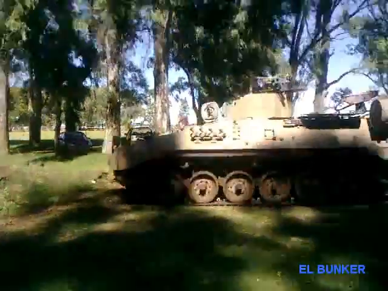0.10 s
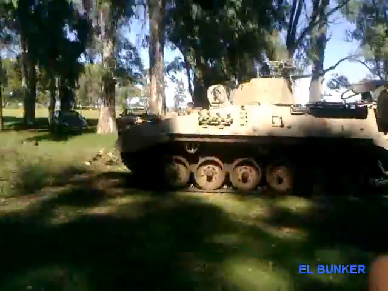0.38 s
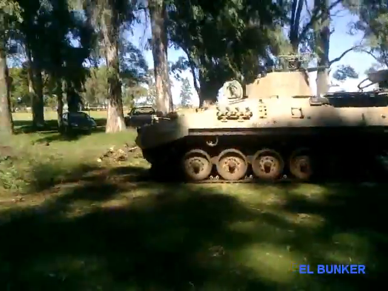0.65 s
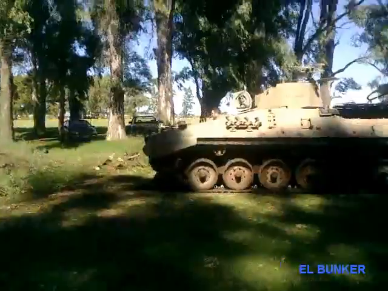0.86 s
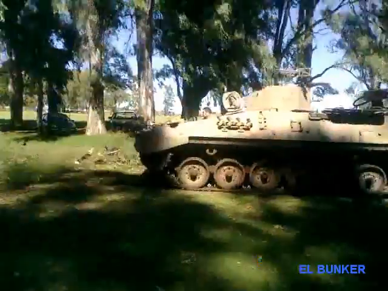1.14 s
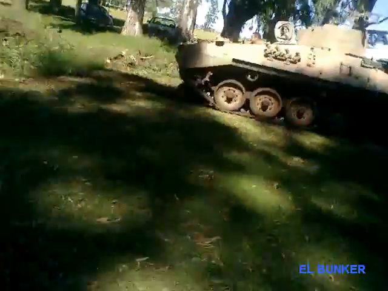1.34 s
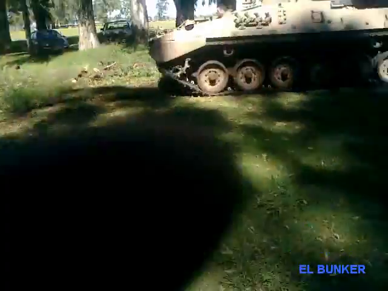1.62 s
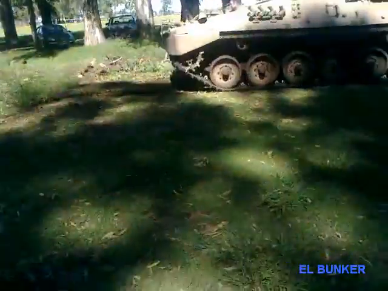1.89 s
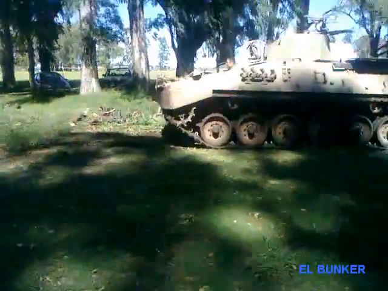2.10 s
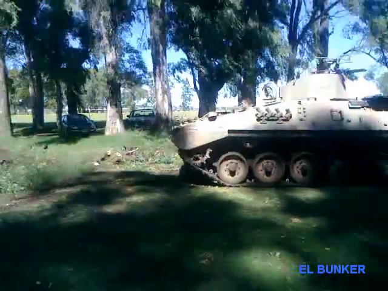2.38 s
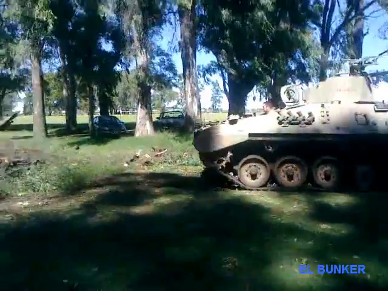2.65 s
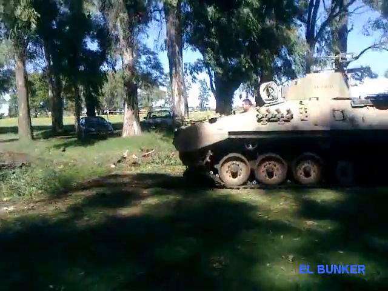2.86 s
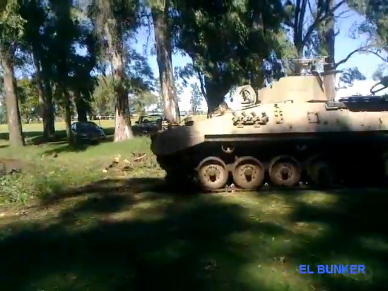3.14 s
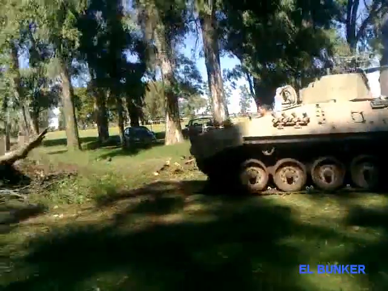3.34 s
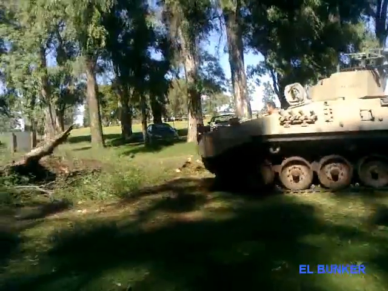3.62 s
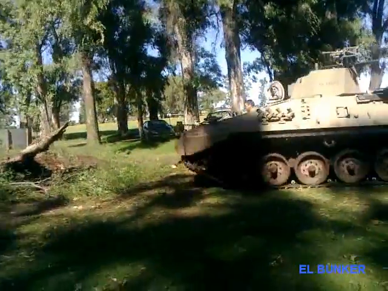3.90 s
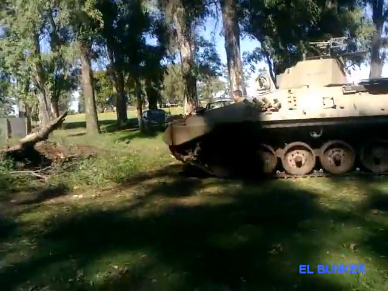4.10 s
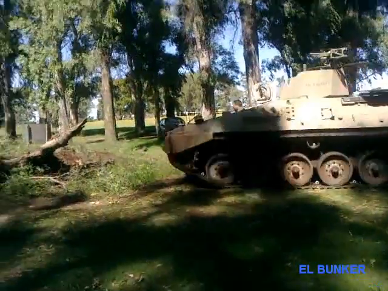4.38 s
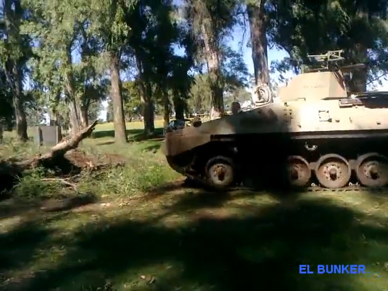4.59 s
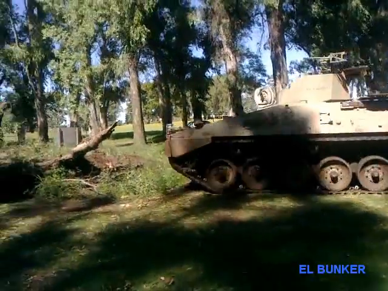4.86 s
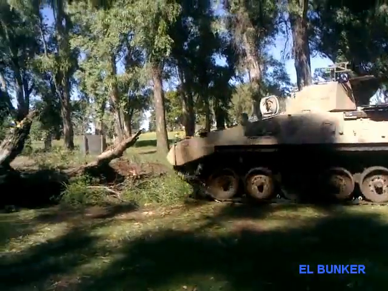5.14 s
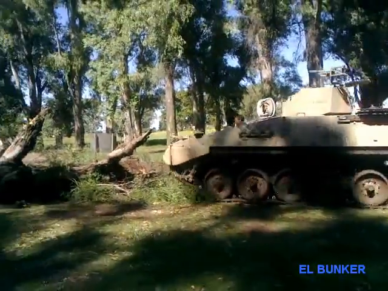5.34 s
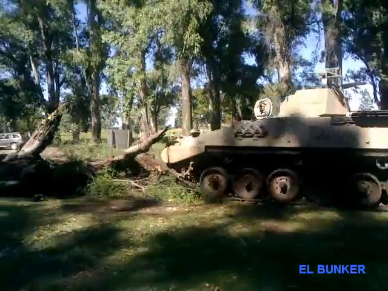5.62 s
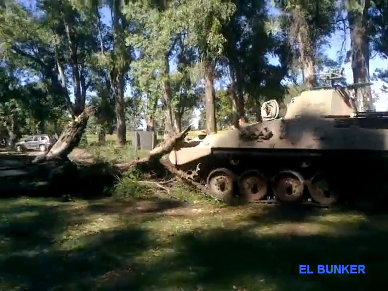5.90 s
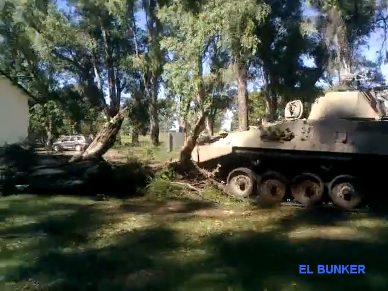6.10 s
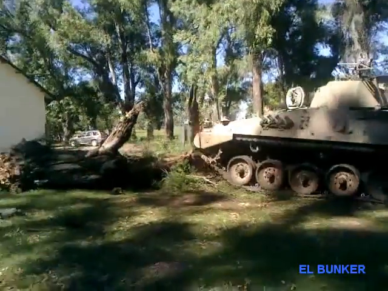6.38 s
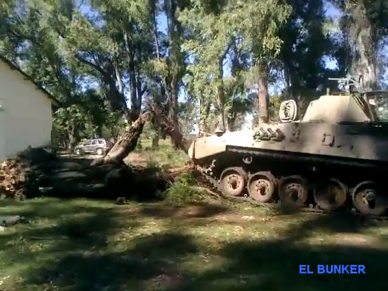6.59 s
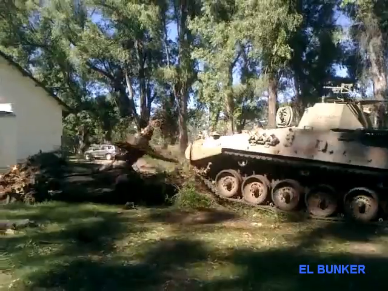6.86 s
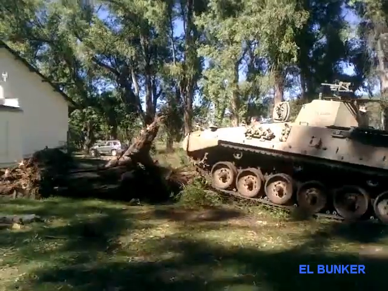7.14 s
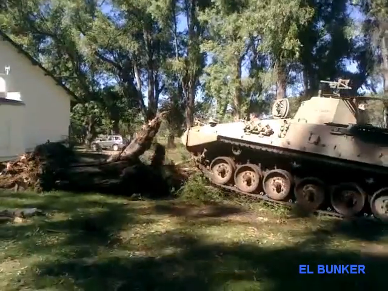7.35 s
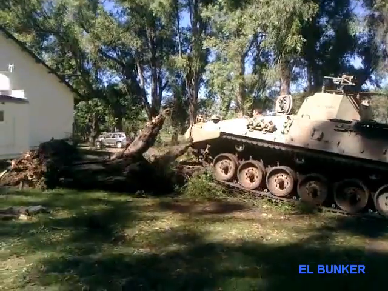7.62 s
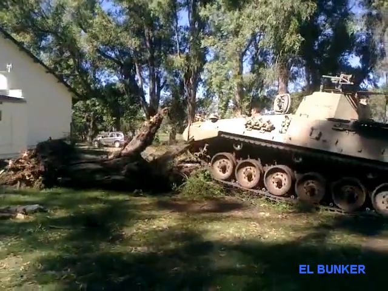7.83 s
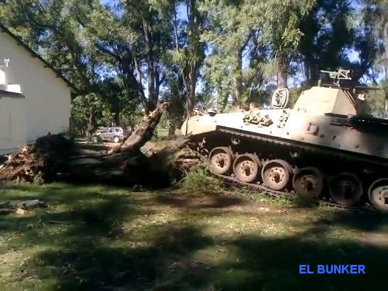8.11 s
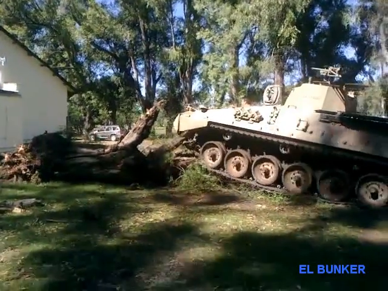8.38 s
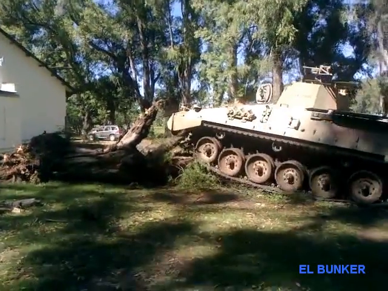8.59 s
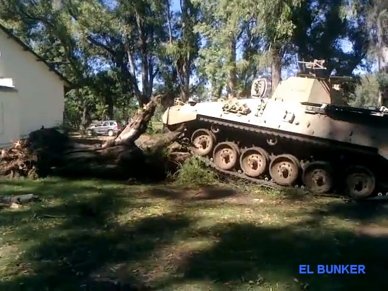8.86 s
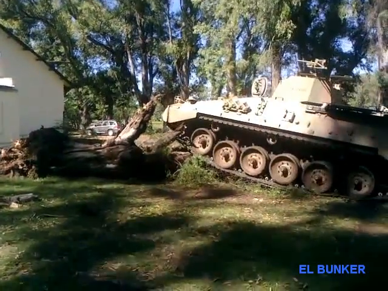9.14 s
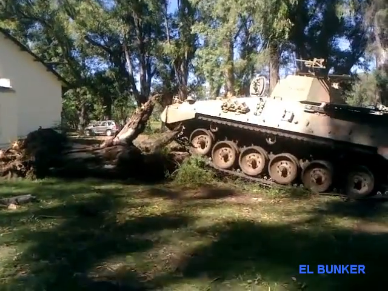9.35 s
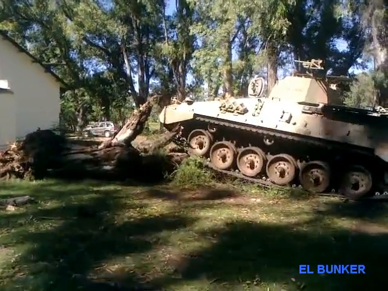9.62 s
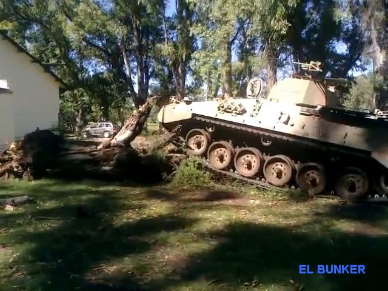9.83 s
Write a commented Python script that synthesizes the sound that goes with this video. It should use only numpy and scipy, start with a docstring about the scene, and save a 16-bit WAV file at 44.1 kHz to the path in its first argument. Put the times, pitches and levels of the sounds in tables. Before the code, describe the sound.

Outdoors, a deep, lumpy diesel growls up and down while steel track links rattle, branches snap and splinter, and leaves rustle.

```python
"""Among trees, a heavy tracked vehicle revs its diesel in five surges and pushes onto a felled trunk. Uneven
firings are pulses shaped into exhaust booms; noise makes valve clatter and hiss, and a tone the fan. Short
noise bursts make track links clank and wood crack; random ticks and noise make twigs and leaves rustle. A phone
some metres off hears it from behind trunks and a wall."""
import sys
import numpy as np
from scipy import signal
from scipy.fft import rfft, irfft
from scipy.io import wavfile
from scipy.ndimage import uniform_filter1d

SR = 44100
rng = np.random.default_rng(int(sys.argv[2]) if len(sys.argv) > 2 else 0)


def digitize_waveform(pressure):
    """Quantize a signal to 16-bit integers and store it at the path in sys.argv[1].

    Rows of a 2-D input are taken as channels; values are limited to [-1, 1].
    """
    field = np.atleast_2d(pressure).T
    bounded = np.clip(field, -1, 1)
    quanta = np.round(bounded * 32767).astype(np.int16)
    wavfile.write(sys.argv[1], SR, quanta)


def voltage_ratio(decibels):
    """Convert decibels (scalar or array-like) to amplitude ratios, 20 dB per decade."""
    exponent = np.asarray(decibels, float) / 20
    return 10 ** exponent


N = 440118
T = np.arange(N) / SR

# the drive crunches into gear: start_s [s], peak_db [dB], length_ms [ms]
GEAR_CRUNCH = (1.746, -27.5, 68)
# ringing of the engine block: pitch_hz [Hz], level_db [dB], time to fall 60 dB ring_s [s]
BLOCK_RING = [(700, 4, 0.024), (1125, 2, 0.045), (1280, -9, 0.07), (2400, -6, 0.05)]
# tone of breaking wood, also used in the gear crunch: pitch_hz [Hz], level_db [dB per Hz]
WOOD_TONE = [(300, 9), (700, 4.5), (1200, 2), (1900, 2), (2700, 3), (3600, -2), (5000, -10.5),
             (7000, -26.5)]
IDLE_HZ = 20.91  # crank turns per second at idle
BRUSHWOOD_S = 5.0  # from here on the links run through brushwood and ring less


def colour(x, points):
    """Tone filter that follows (Hz, dB) points and never sounds before its input."""
    hz, db = np.transpose(points)
    size = 16384
    bins_hz = np.arange(1, size // 2 + 2) * SR / size
    log_gain = np.interp(np.log(bins_hz), np.log(hz), db) * np.log(10) / 20
    # folding the cepstrum (the spectrum of the log gain) makes the filter causal
    cepstrum = irfft(log_gain)
    cepstrum[1:size // 2] *= 2
    cepstrum[size // 2 + 1:] = 0
    response = irfft(np.exp(rfft(cepstrum)))[:size // 2]
    return signal.fftconvolve(x, response)[:len(x)]


def unit(x):
    """Scale to an average strength (rms) of 1."""
    return x / np.sqrt(np.mean(x ** 2))


def walk(rate):
    """A smooth random wander with `rate` new levels a second and an rms of 1."""
    hold = int(SR / rate)
    steps = np.repeat(rng.standard_normal(N // hold + 1), hold)
    smooth = uniform_filter1d(uniform_filter1d(steps, hold), hold)
    return unit(smooth[:N])


def ring(x, hz, t60):
    """One ringing tone set off by x, falling 60 dB in t60 seconds."""
    pole = np.exp(2j * np.pi * hz / SR - np.log(1000) / (t60 * SR))
    return signal.lfilter([1], [1, -pole], x).imag


def modes(x, table):
    """Several ringing tones struck together, scaled to rms 1."""
    return unit(sum(voltage_ratio(db) * ring(x, hz, t60) for hz, db, t60 in table))


def add(out, start_s, sound):
    """Mix a short sound in at its start time."""
    i = int(start_s * SR)
    out[i:i + len(sound)] += sound[:N - i]


def burst(length_ms, scatter_db):
    """A run of tiny slips of uneven size that swells, then dies away."""
    t_ms = np.arange(SR // 8) / SR * 1000
    # a new random size about every millisecond
    sizes = np.repeat(rng.exponential(size=len(t_ms) // 44 + 1), 44)[:len(t_ms)]
    slips = rng.standard_normal(len(t_ms)) * voltage_ratio(scatter_db * sizes)
    swell = np.minimum(t_ms / (0.22 * length_ms), 1)
    return slips * np.exp(-(t_ms / length_ms) ** 1.2) * swell


def pedal():
    """Crank rate and exhaust level: the pedal pulls the flywheel up, drag slows it, the governor catches it."""
    # pedal presses, the first two run together: press_s [s], release_s [s], aim_hz (rate it pulls towards) [Hz],
    # coasting_loss [Hz per s], settle_hz [Hz], ease_off_s [s]
    presses = [(1.447, 2.551, 26.35, 28, 25.5, 0.13), (2.589, 3.3, 42.75, 60, 21.8, .42),
               (4.09, 4.88, 43.81, 12.8, 26.1, 0.13), (5.616, 6.377, 52.87, 33.6, 22.1, .12),
               (7.463, 8.359, 46.05, 41.1, 19.6, .14), (9.139, 10.502, 45.14, 36.6, 19.8, .1)]
    # changes of exhaust level: start_s [s], pedal_down_db [dB], pedal_up_db [dB]
    effort = [(1.5, 1, -0.5), (3, 0.35, -2), (5, -.5, 1.5), (6.5, -2.5, -1.5), (8, 1, -1.5),
              (10, 2.5, -1.5)]
    pull_s, torque_s, landing_hz = .655, .139, 3.67  # how fast it climbs, grips and settles
    mid_hz = 31.2  # the crank rate at which the two base levels below apply
    open_db, open_db_per_hz, shut_db, shut_db_per_hz = -25.5, 0.6, -29, 0.4952
    kick_db_per_hz = 0.1547  # louder while far below the rate it pulls towards
    governor_db, governor_hz = 4.5, 2.4  # fuel comes back near the settling rate
    # the exhaust answers the pedal late, and sharply when pressed
    fuel_on_s, fuel_off_s, fuel_edge_s = 0.078, 0.018, 0.023

    step_s = .01
    t = np.arange(0, N / SR + step_s, step_s)
    press, release, aim_hz, loss, rest_hz, ease = np.transpose(presses)

    def held(on_delay, off_delay, edge):
        """How far each press is felt, from 0 to 1, after the given delays in seconds."""
        pressed = np.clip((t[:, None] - on_delay - press) / edge, 0, 1)
        let_go = np.clip((t[:, None] - off_delay - release) / ease, 0, 1)
        return pressed - let_go

    torque = held(0, 0, torque_s)
    fuel = held(fuel_on_s, fuel_off_s, fuel_edge_s).sum(axis=1)
    pull, grip = torque @ aim_hz, torque.sum(axis=1)
    last = np.searchsorted(release, t)  # how many presses are over
    loss = np.r_[loss[0], loss][last]
    rest_hz = np.r_[IDLE_HZ, rest_hz][last]
    hz, now = np.empty(len(t)), IDLE_HZ
    for i in range(len(t)):
        hz[i] = now
        climb = (pull[i] - grip[i] * now) / pull_s
        drag = (1 - grip[i]) * loss[i] * np.tanh((now - rest_hz[i]) / landing_hz)
        now += step_s * (climb - drag)

    start_s, down_db, up_db = np.transpose(effort)
    kick = kick_db_per_hz * (pull - grip * hz)
    opened = kick + open_db + open_db_per_hz * (hz - mid_hz) + np.interp(t, start_s, down_db)
    governor = governor_db * np.exp(-((hz - rest_hz) / governor_hz) ** 2)
    shut = np.interp(t, start_s, up_db) + shut_db + shut_db_per_hz * (hz - mid_hz) + governor
    return np.interp(T, t, hz), np.interp(T, t, fuel * opened + (1 - fuel) * shut)


def firings(hz, turns, load, ragged):
    """Firings are single pulses at uneven points of each crank turn; each also starts a fading puff."""
    # firings heard in one turn: turn_share [0 to 1], idle_db [dB], load_db [dB]
    firing_points = [(0, -3, 11.5), (0.373, 0.5, -11.5), (0.697, -39.5, 4.5)]
    pulses, puffs = np.zeros(N + 1), 0
    for share, idle_db, load_db in firing_points:
        chance = rng.standard_normal((int(turns[-1]) + 1, 2)).T
        turn = np.arange(chance.shape[1]) + share
        chance = chance * np.interp(turn, turns, ragged)
        # every firing comes a little early or late, weak or strong
        place = np.interp(turn + .011 * chance[0], turns, np.arange(N))
        i = place.astype(int)
        scatter_db = .7 * chance[1]
        level_db = idle_db + (load_db - idle_db) * load[i] + scatter_db
        size = voltage_ratio(level_db) / np.sqrt(hz[i]) * (i < N - 1)
        # share each pulse between its two nearest samples
        np.add.at(pulses, i, size * (1 - place + i))
        np.add.at(pulses, i + 1, size * (place - i))
        puffs = puffs + np.exp(-((turns - share) % 1) / .2)
    return pulses[:N], puffs


def exhaust(pulses, puffs, load, ragged, exhaust_db, strain_db):
    """The pipe turns firing pulses into booms and rasp, and puffs of turbulent gas into a roar."""
    # boom and gas tone: pitch_hz [Hz], level_db [dB]
    boom_tone = [(12, -78.5), (21, 7.5), (32, -6), (44, 1.5), (58, 10), (78, 13), (125, 3.5), (200, -14),
                 (330, -22), (2000, -120)]
    # sharp edge of firings under load: pitch_hz [Hz], level_db [dB]
    rasp_tone = [(90, -35.5), (150, -5), (190, 5), (230, -4.5), (270, -18), (480, -22), (1500, -100)]
    # roar of turbulent gas in the pipe: pitch_hz [Hz], level_db [dB per Hz]
    bark_tone = [(60, -49.5), (125, -2.5), (220, -15), (300, -22.5), (420, -23.5), (3000, -120)]
    boom = -unit(colour(pulses, boom_tone)) * voltage_ratio(exhaust_db)
    uneven = voltage_ratio(2 * walk(70))
    rasp = -unit(colour(pulses * uneven, rasp_tone)) * load ** 2 * voltage_ratio(exhaust_db - 11.5)
    bark = unit(colour(rng.standard_normal(N) * (.5 + puffs), bark_tone)) * ragged
    bark = bark * voltage_ratio(exhaust_db - 20.5 + 3 * load + .3 * strain_db)
    gas = unit(colour(rng.standard_normal(N) * (.3 + puffs), boom_tone)) * ragged
    gas = gas * voltage_ratio(exhaust_db - 21)
    return boom + rasp + bark + gas


def clatter_and_hiss(puffs, load, strain_db):
    """Valve clatter and a steadier hiss are noise swelling slightly with each firing."""
    # clatter tone: pitch_hz [Hz], level_db [dB per Hz]
    clatter_tone = [(100, -16.5), (200, -3.5), (400, -19.5), (600, -13.5), (900, -24.5), (1200, -22.5),
                    (1500, -27.5), (1900, -27.5), (5000, -88)]
    # hiss tone: pitch_hz [Hz], level_db [dB per Hz]
    hiss_tone = [(1500, -14.5), (1900, -8), (2500, -5.5), (3000, -5.5), (3900, -14.5), (5700, -29),
                 (8000, -35.5), (10500, -41.5), (15500, -49.5)]
    heave = uniform_filter1d(load, SR // 4) - .4
    # the hiss rises by up to 7.5 dB around the gear crunch
    in_gear = np.clip((T - GEAR_CRUNCH[0] + 0.61) / 0.84, 0, 1)
    clatter_db = -47.5 + strain_db + 0.5 * heave
    hiss_db = -65 + 0.39 * strain_db + 2.5 * heave + 7.5 * in_gear
    clatter = unit(colour(rng.standard_normal(N) * (6.1 + puffs), clatter_tone)) * voltage_ratio(clatter_db)
    hiss = unit(colour(rng.standard_normal(N) * (3.6 + puffs), hiss_tone))
    return clatter + hiss * voltage_ratio(hiss_db + 0.41 * walk(12))


def knock(turns, load, exhaust_db, strain_db):
    """Under load, a blow of noise once a crank turn sets the engine block ringing."""
    blows = rng.standard_normal(N) * np.exp(-(turns % 1) / .09)
    ringing = modes(colour(blows, [(3000, -9), (8000, -40.0)]), BLOCK_RING)
    return ringing * load * voltage_ratio(exhaust_db + 0.5 * strain_db - 30.0)


def fan():
    """The fan blades whine as one tone of wavering pitch and level."""
    # whine: start_s [s], pitch_hz [Hz], level_db [dB]
    whine = [(0, 585.5, -53.5), (1.503, 587, -54), (2.801, 647.5, -54), (3.399, 652.3, -69.5),
             (8.398, 651, -53.5), (8.901, 611.4, -50.5), (9.3, 583, -60), (9.98, 636.2, -49.5)]
    start_s, hz, db = np.transpose(whine)
    hz = np.interp(T, start_s, hz) * (1 + .004 * walk(30))
    return np.sin(2 * np.pi * np.cumsum(hz) / SR) * voltage_ratio(np.interp(T, start_s, db) + 2.8 * walk(26))


def whistle(hz):
    """The air intake's narrow wavering hiss is low noise moved up to a pitch that rises with the crank rate."""
    band = unit(colour(rng.standard_normal(N), [(60, 1.5), (200, -18), (600, -45)]))
    pitch_hz = 2900 + 22 * (hz - IDLE_HZ) + 40 * walk(4)
    return band * np.sin(2 * np.pi * np.cumsum(pitch_hz) / SR) * voltage_ratio(-67 + 3.8 * walk(2.8))


def engine():
    """Load and strain shape rasp, roar, clatter, hiss and knock; fan and intake hiss have their own levels."""
    # how hard the running gear works: start_s [s], strain_db [dB]
    strain = [(0, 1.5), (1.4, 1.5), (2.0, 2), (5.3, 7), (6.1, 12), (7.4, 3.5), (8.2, 7), (9.15, 3),
              (9.98, 12)]
    hz, exhaust_db = pedal()
    load = np.clip((exhaust_db + 35.5) / 14, 0, 1)
    strain_db = np.interp(T, *np.transpose(strain))
    # the engine fires raggedly while it slows down
    slowing = -uniform_filter1d(np.gradient(hz) * SR, SR // 20)
    ragged = 1 + .9 * np.clip(slowing / 25, 0, 1)
    turns = np.cumsum(hz * (1 + .004 * walk(13))) / SR
    pulses, puffs = firings(hz, turns, load, ragged)
    out = exhaust(pulses, puffs, load, ragged, exhaust_db, strain_db)
    out = out + clatter_and_hiss(puffs, load, strain_db)
    out = out + knock(turns, load, exhaust_db, strain_db)
    return out + fan() + whistle(hz)


def rustle():
    """Twigs snap at random, each a few ms long, over a smoother noise bed of leaves."""
    # leaves stirred, later branches dragged and flattened:
    # peak_s [s], level_db [dB], swell_s [s], fade_s [s]
    stirrings = [(1.17, -65.5, 0.06, 0.065), (1.46, -75, .04, .07), (2.39, -65, .008, .015),
                 (7.2, -63.5, .12, 0.059), (6.0, -59.5, 0.16, 0.77), (6.109, -54, 0.016, 0.041),
                 (6.74, -57, 0.36, 0.21), (7.81, -54, 0.014, 0.022), (8.41, -51, 0.056, 0.08),
                 (8.8, -63, 0.25, 0.11), (9.9, -66, 0.36, 0.26)]
    # leaf tone: pitch_hz [Hz], level_db [dB per Hz]
    leaf_tone = [(700, -26.5), (1500, -21), (2700, -4), (6600, -19), (11000, -18), (13600, -24),
                 (15500, -40)]
    snaps = (rng.random(N) < 120 / SR) * voltage_ratio(4 * rng.exponential(size=N))  # about 120 a second
    snaps = signal.lfilter([1], [1, -np.exp(-1 / (0.01 * SR))], snaps)
    leaves = unit(colour(rng.standard_normal(N), leaf_tone))
    stir = 0
    for peak_s, db, swell, fade in stirrings:
        stir = stir + voltage_ratio(db) * np.exp(np.where(T < peak_s, (T - peak_s) / swell, (peak_s - T) / fade))
    level = voltage_ratio(-68.5 + 2.0 * walk(5)) + stir * (unit(snaps) + 1.2) / 2
    return leaves * level + splinters(stir * (T > BRUSHWOOD_S))


def tracks():
    """Links slap the wheels as short dry steel rattles with a brief ring; the gear crunches and the hull thuds."""
    # track links slapping the wheels: start_s [s], peak_db [dB]
    clanks = [(3.701, -33.5), (3.8175, -34.5), (3.932, -30), (4.0513, -37.5), (4.1694, -37), (4.7506, -35),
              (5.1015, -27), (5.44, -27.5), (5.514, -31.5), (5.6013, -29.5), (5.6835, -33), (5.7634, -32),
              (5.8494, -26.5)]
    # link tone: pitch_hz [Hz], level_db [dB per Hz]
    link_tone = [(350, -7.5), (620, 3.5), (900, -2), (1250, 0.5), (1700, -6.5), (2300, -4.5), (3000, -31.5),
                 (4000, -17.5), (5500, -29), (8000, -48)]
    # link ringing: pitch_hz [Hz], level_db [dB], time to fall 60 dB ring_s [s]
    link_ring = [(2860, 8.5, 0.0061), (3100, -3, 0.022), (3480, -8.5, 0.028)]
    out = np.zeros(N)
    for start_s, db in clanks:
        length_ms, ringing = (10, 1.3) if start_s < BRUSHWOOD_S else (17, .45)
        rattle = burst(length_ms, 0.9)
        strike = colour(rattle, [(1500, -28.5), (2500, -3), (4000, -2.5), (7000, -29.0)])
        clank = unit(colour(rattle, link_tone)) + ringing * modes(strike, link_ring)
        add(out, start_s, clank / np.abs(clank).max() * voltage_ratio(db))

    gear_s, gear_db, gear_ms = GEAR_CRUNCH
    grind = colour(burst(gear_ms, .9), [(700, -0.5), (3800, -5), (7000, -33)])
    grind = unit(colour(grind, WOOD_TONE)) + 0.78 * modes(grind, BLOCK_RING)
    add(out, gear_s, grind / np.abs(grind).max() * voltage_ratio(gear_db))
    # the hull answers the gear with a low ring, faded to nothing
    thud = ring(colour(burst(gear_ms, 1.3), [(250, 4), (600, -27)]), 150, 0.27)
    add(out, gear_s, thud / np.abs(thud).max() * voltage_ratio(-29) * np.linspace(1, 0, len(thud)))
    return out


def splinters(stir):
    """Small random cracks inside the dragged branches, each a fading tick of noise."""
    cracks = (rng.random(N) < 220 / SR) * voltage_ratio(3.6 * rng.exponential(size=N))  # about 220 a second
    cracks = signal.lfilter([1], [1, -np.exp(-1 / (0.0046 * SR))], cracks) * rng.standard_normal(N)
    return unit(colour(cracks, WOOD_TONE)) * stir * voltage_ratio(10)


def wood():
    """Fibres snap in a quick run: a broad crack, one short ring and a dry treble spit."""
    # breaking wood: start_s [s], level_db (before a shared 2 dB cut) [dB], ring_hz [Hz],
    # treble_db (beside the broad crack) [dB]
    breaks = [(5.8962, -18, 873, -42), (5.9428, -25.5, 2780, -30), (5.9732, -16, 1094, -22),
              (6.005, -16, 680, -18.5), (6.03, -17.5, 2800, -17.5), (6.093, -22, 2900, -13),
              (6.243, -34.5, 2800, -14), (6.2806, -31, 2390, -26), (6.2958, -18, 1150, -24.5),
              (6.4928, -21.5, 1240, -27), (6.5168, -29, 3150, -17), (6.545, -27.5, 2460, -20),
              (6.6349, -27, 2710, -42.5), (6.653, -22, 2770, -28), (6.681, -23.5, 820, -20),
              (6.704, -32, 2520, -10), (6.839, -23, 2840, -21), (7.142, -30.5, 1630, -19),
              (7.7656, -30, 972, -17), (8.3619, -25, 2430, -17), (8.393, -24, 1120, -18.5),
              (8.43, -21, 1250, -34), (8.4705, -20, 2760, -20), (8.5965, -27.5, 3160, -17.5),
              (8.659, -30.5, 1280, -44), (8.673, -27, 2260, -32), (8.7038, -23.5, 2900, -19.5),
              (8.7212, -26, 2860, -18), (8.7754, -22, 2230, -11.5), (9.931, -35.5, 696, -40)]
    out = np.zeros(N)
    for start_s, db, hz, treble_db in breaks:
        snap = burst(14, 2.8)
        body, note = unit(colour(snap, WOOD_TONE)), unit(ring(snap, hz, 0.015))
        spit_tone = [(5000, -30.0), (7000, -1.5), (10000, -3.5), (13000, -5.5), (16000, -34.0)]
        spit = unit(colour(snap, spit_tone))
        crack = body + .5 * note + voltage_ratio(treble_db) * spit
        # level set by the 12th largest sample, so a lone spike does not decide it
        add(out, start_s, crack / np.sort(np.abs(crack))[-12] * voltage_ratio(db - 2))
    return out


def echoes(sharp):
    """Trunks and a wall send sharp sounds back as a short, faint tail of fading noise."""
    t = T[:SR // 2]
    # falls 60 dB in 0.06 s, silent for the first 8 ms
    tail = rng.standard_normal(len(t)) * np.exp(-np.log(1000) * t / 0.06) * (t > .008)
    tail = colour(tail, [(3000, -8.5), (12000, -8.0)])
    return voltage_ratio(-17) * signal.fftconvolve(sharp, tail / np.sqrt(np.sum(tail ** 2)))[:N]


def scene():
    """Engine, tracks, wood and leaves add up in the air; only the sharp sounds echo."""
    sharp = tracks() + wood()
    return (engine() + sharp + echoes(sharp) + rustle())[None]


def roll_off(x):
    """The treble ends steeply here."""
    return signal.sosfilt(signal.butter(12, 15730, fs=SR, output="sos"), x)


def record(dry):
    """The phone cuts the top of the treble with a steep filter at 15700 Hz."""
    top_cut = signal.ellip(8, .2, 60, 15700, fs=SR, output="sos")
    mix = signal.sosfilt(top_cut, dry)
    return roll_off(mix)


dry = scene()
out = record(dry)
digitize_waveform(out)
```